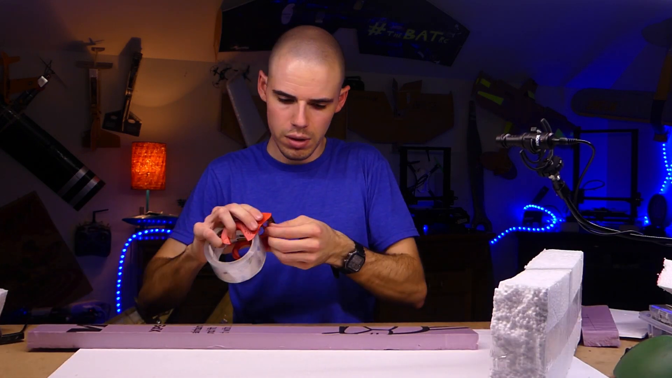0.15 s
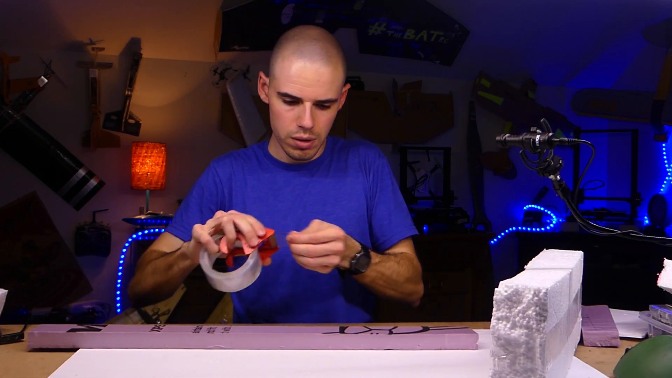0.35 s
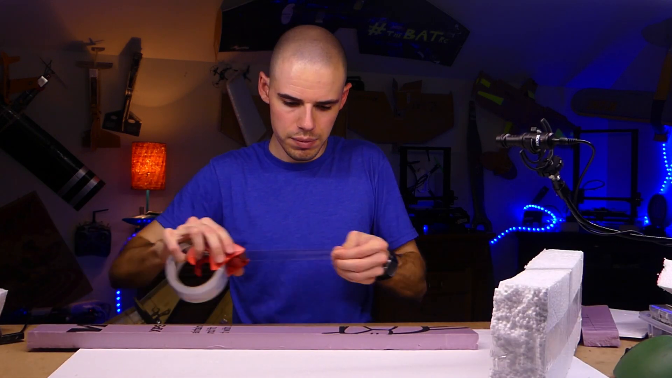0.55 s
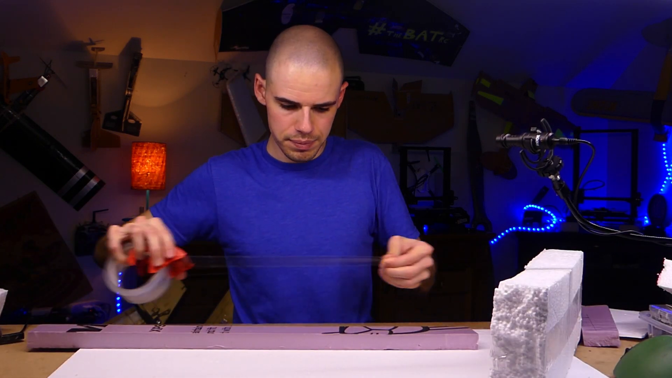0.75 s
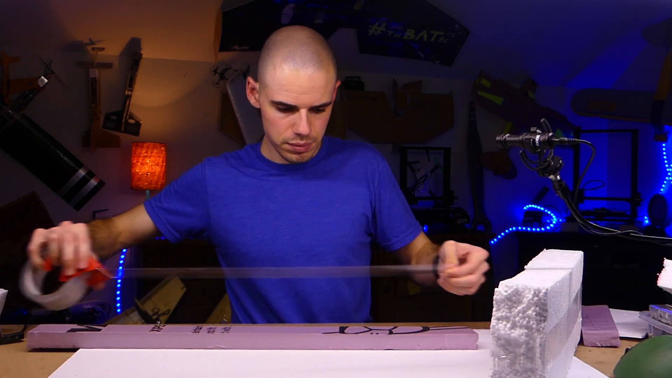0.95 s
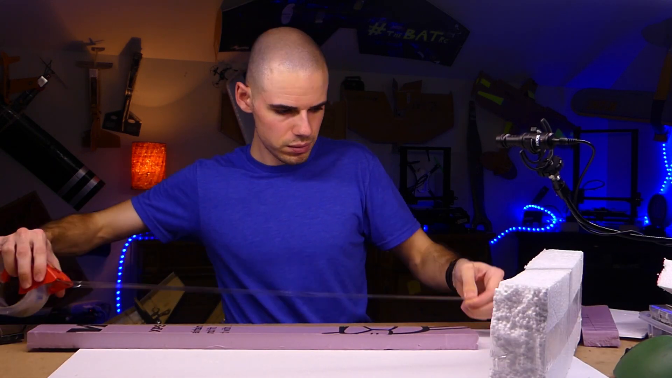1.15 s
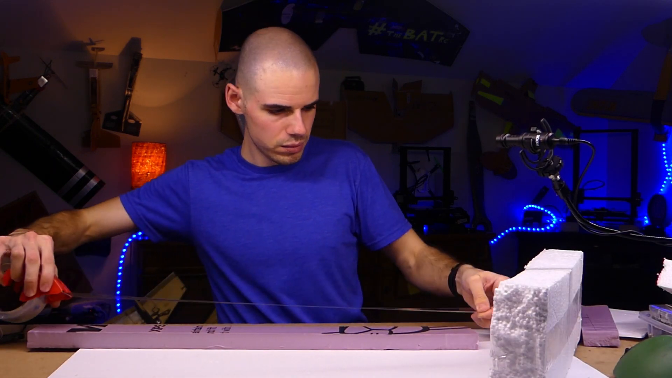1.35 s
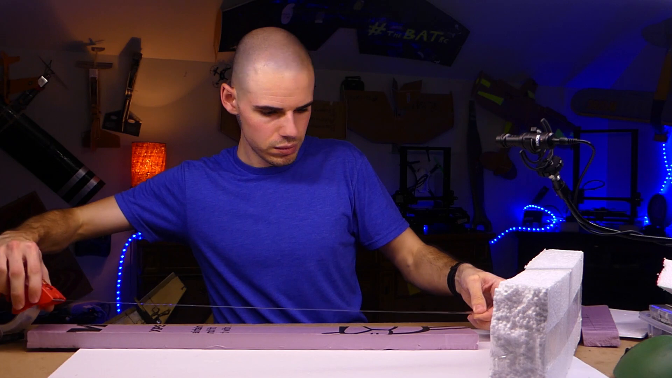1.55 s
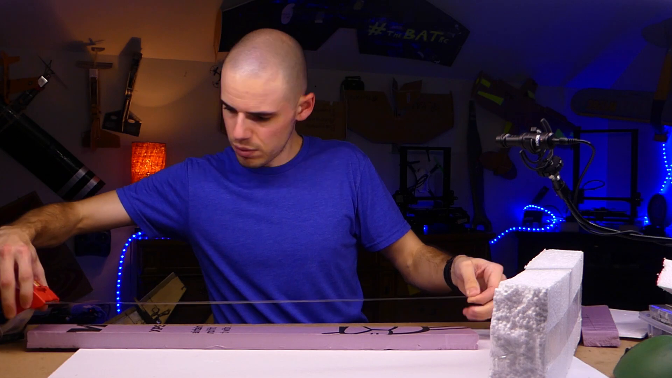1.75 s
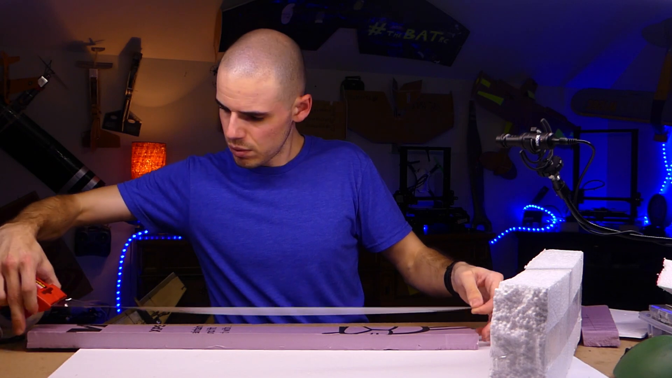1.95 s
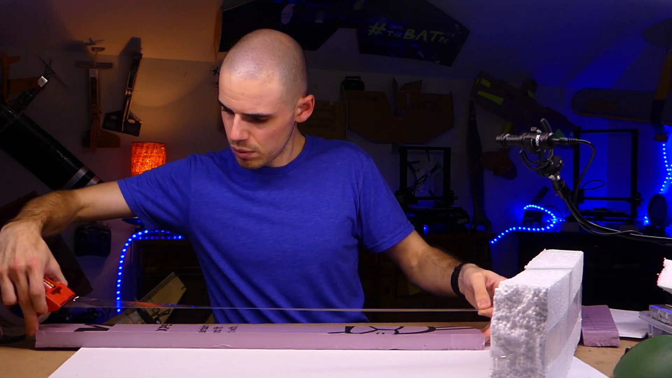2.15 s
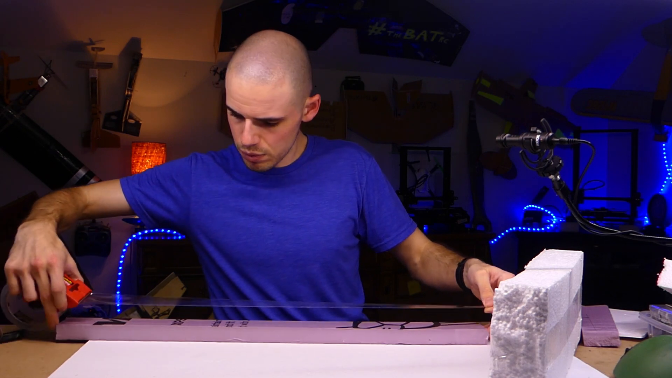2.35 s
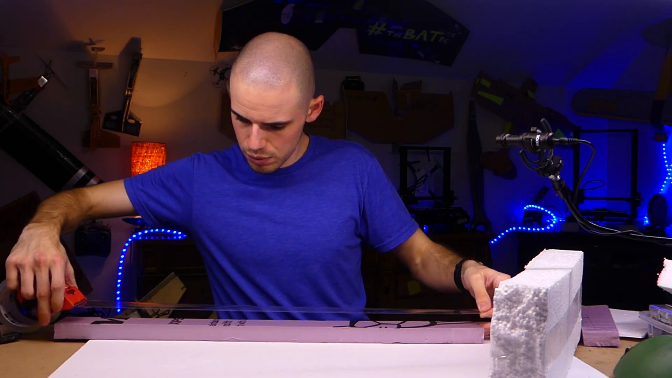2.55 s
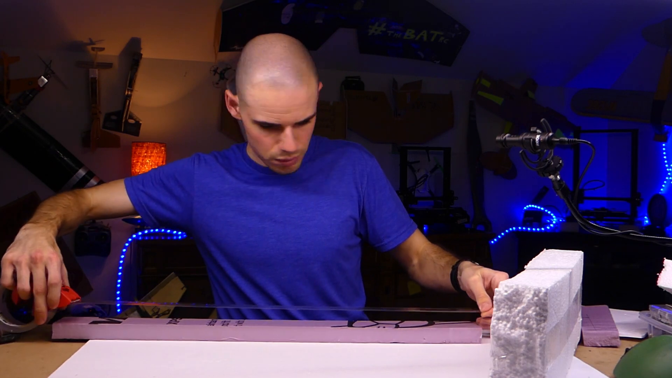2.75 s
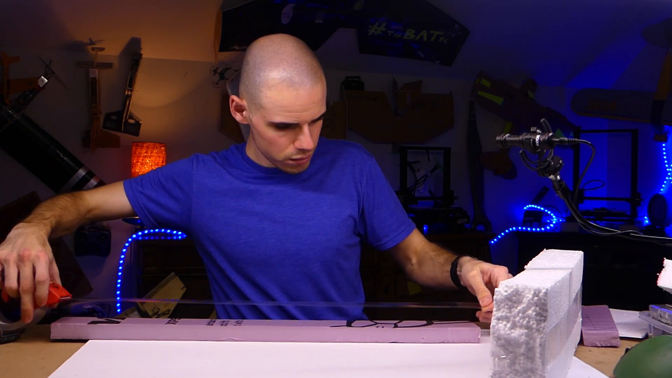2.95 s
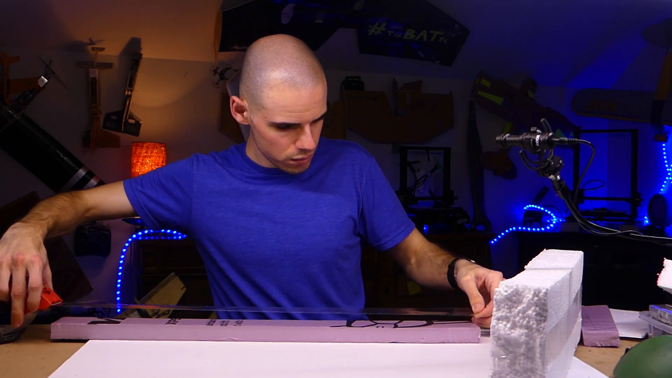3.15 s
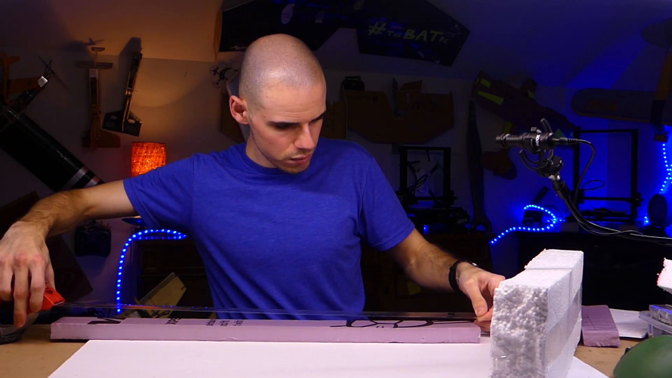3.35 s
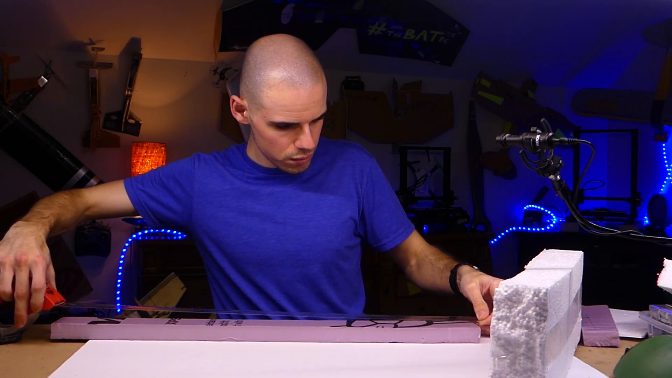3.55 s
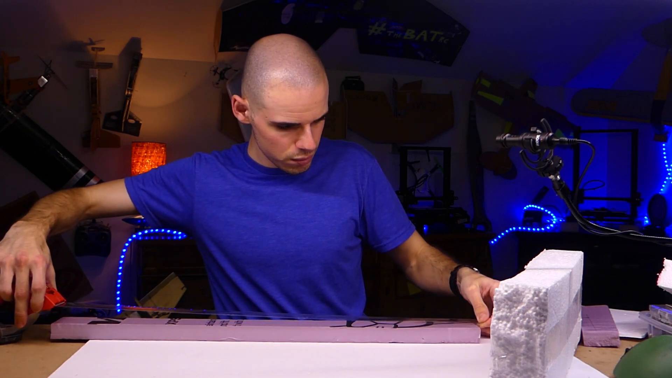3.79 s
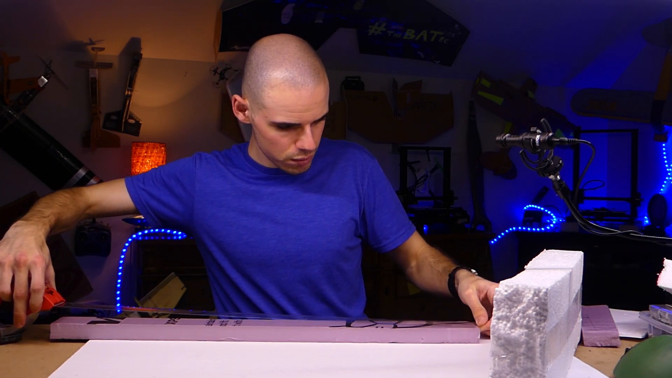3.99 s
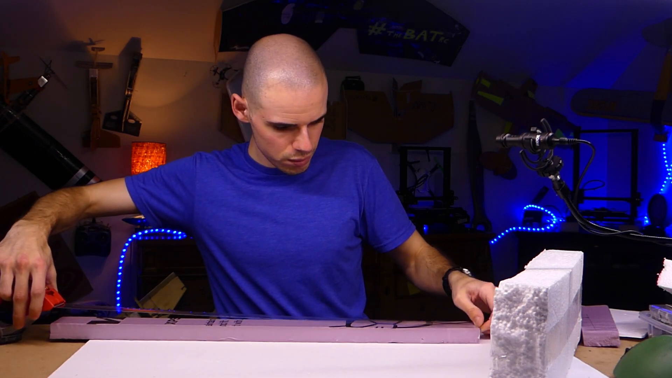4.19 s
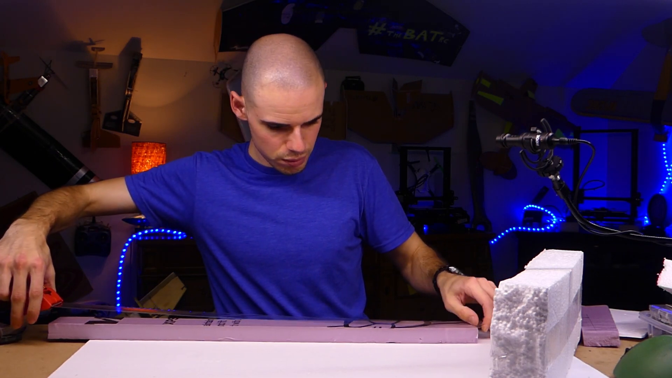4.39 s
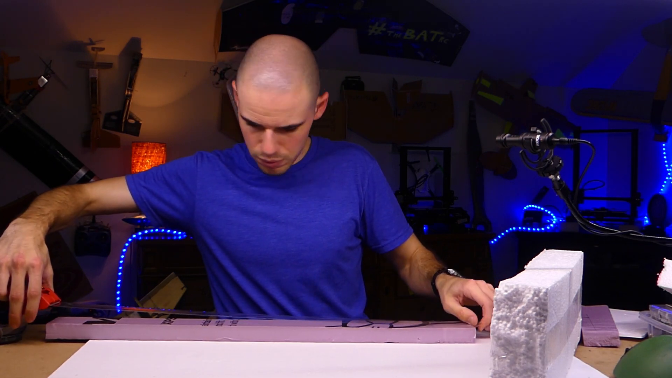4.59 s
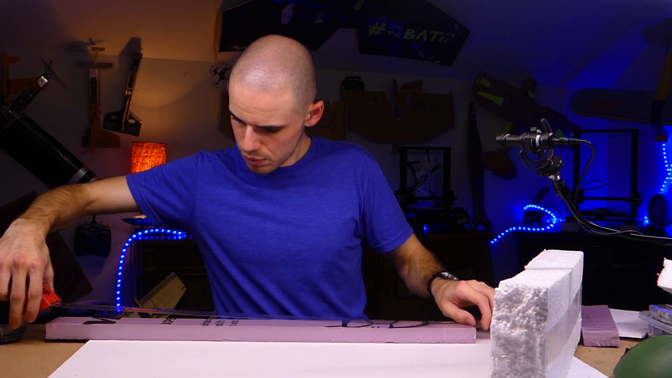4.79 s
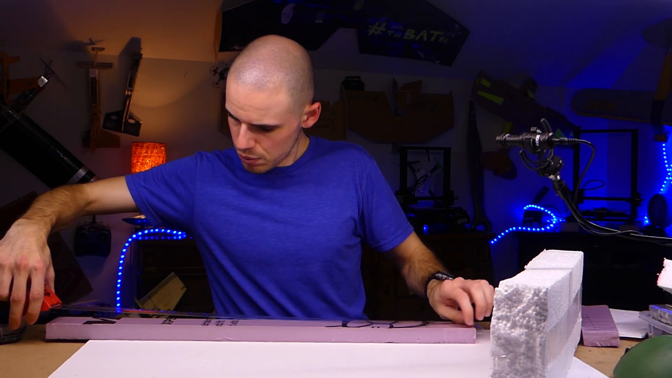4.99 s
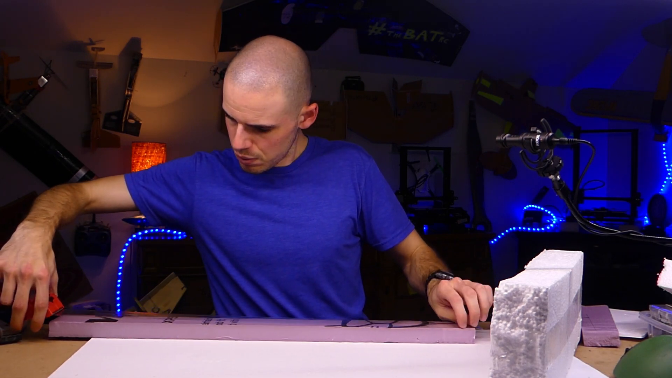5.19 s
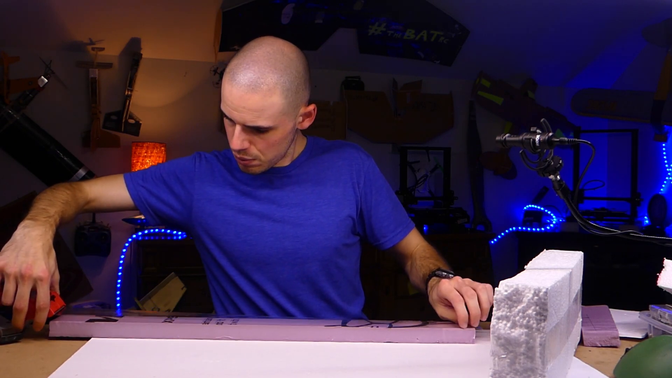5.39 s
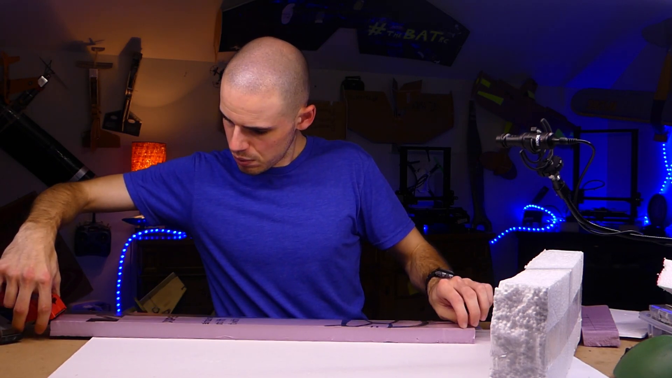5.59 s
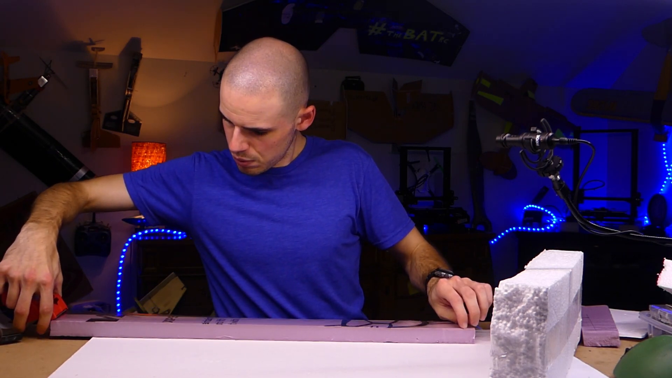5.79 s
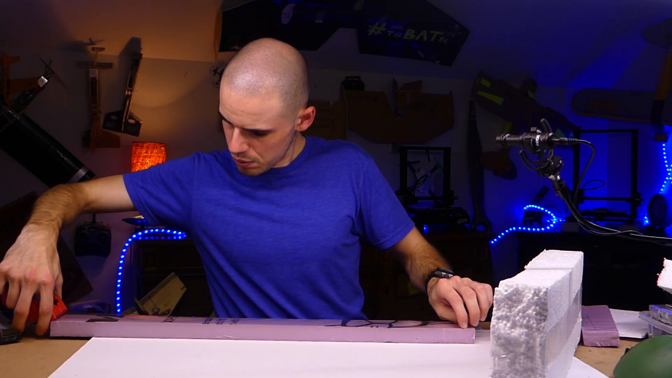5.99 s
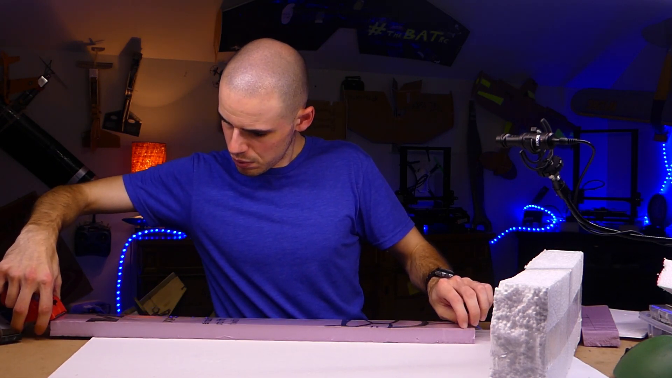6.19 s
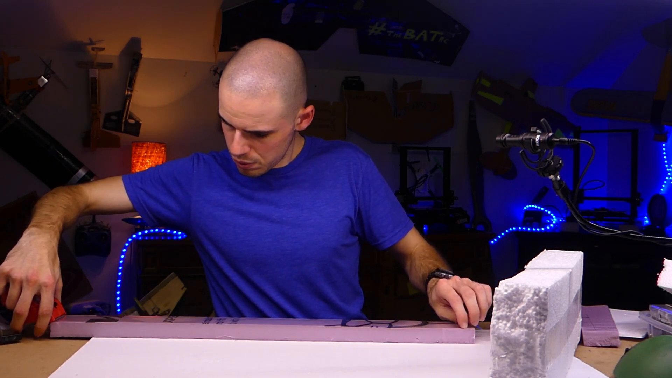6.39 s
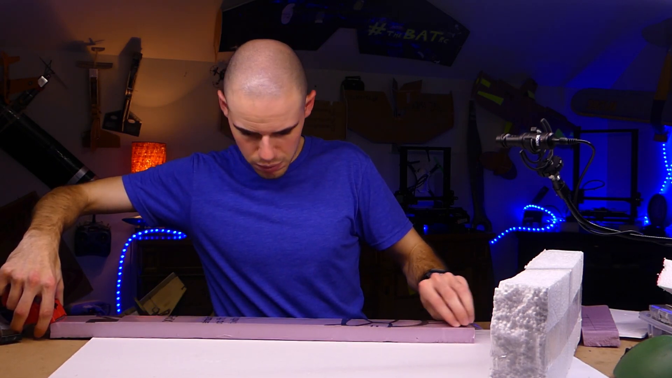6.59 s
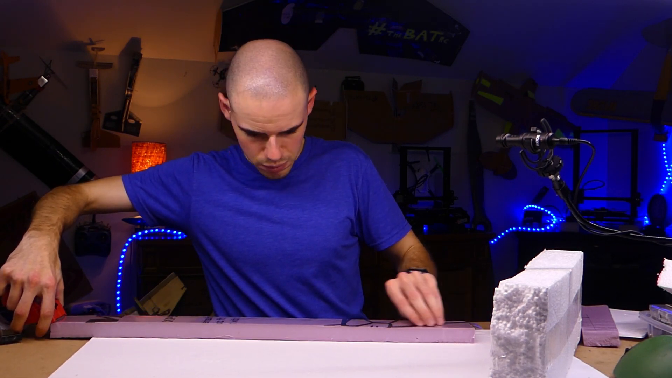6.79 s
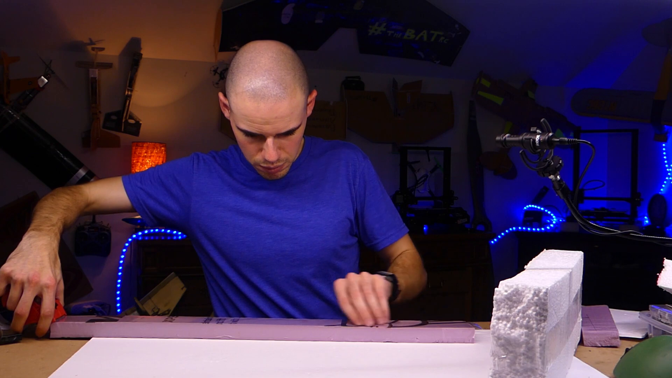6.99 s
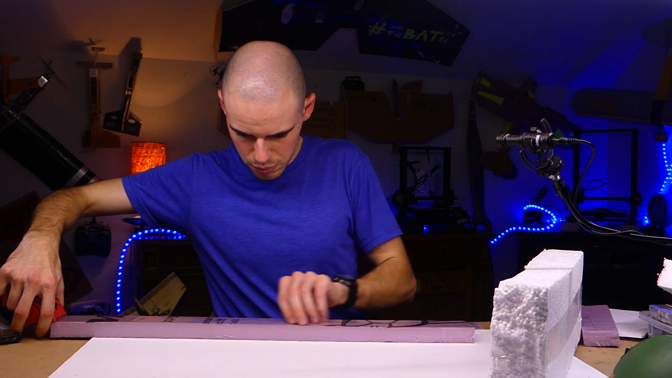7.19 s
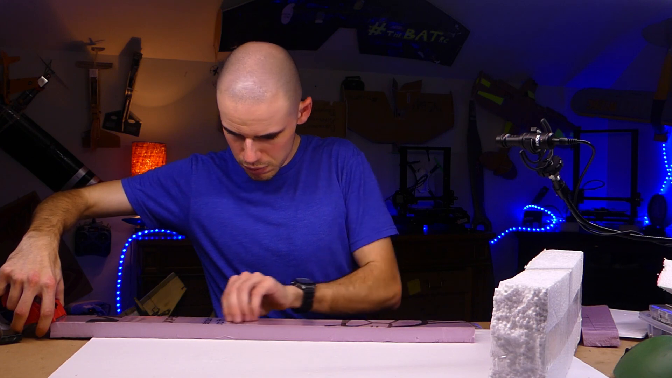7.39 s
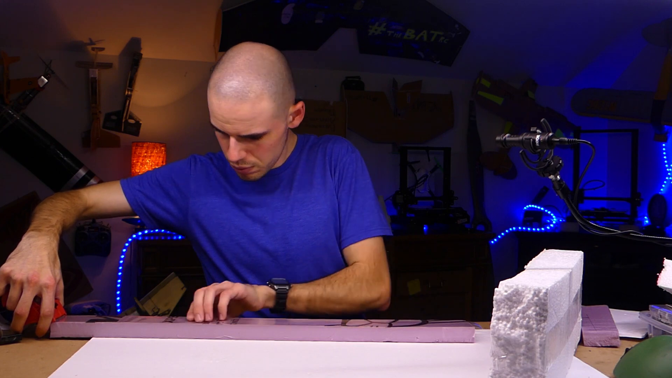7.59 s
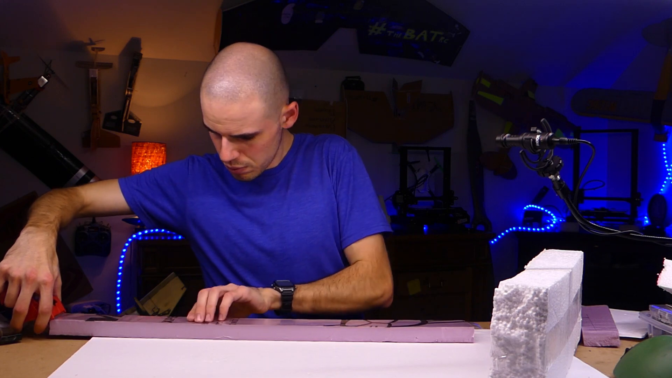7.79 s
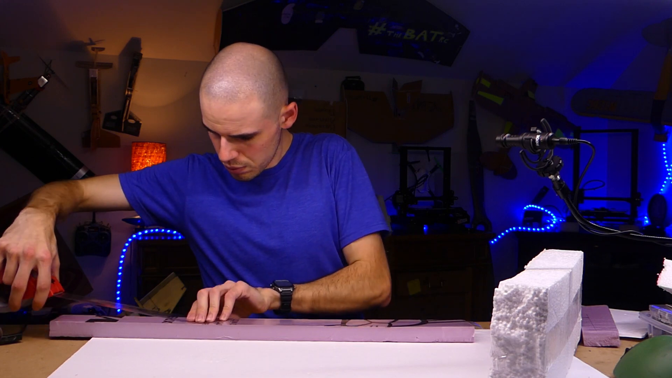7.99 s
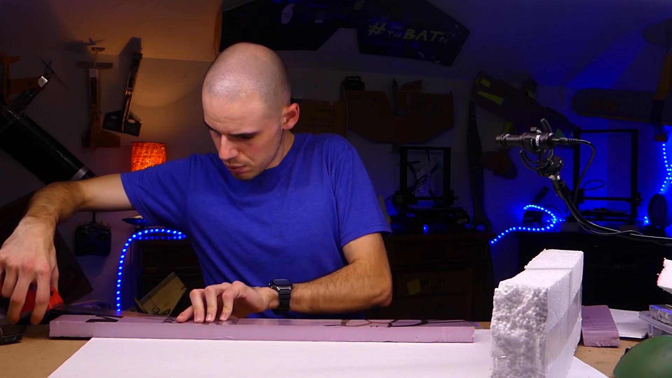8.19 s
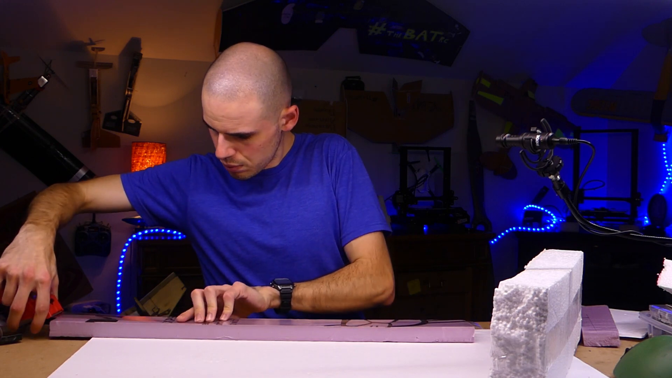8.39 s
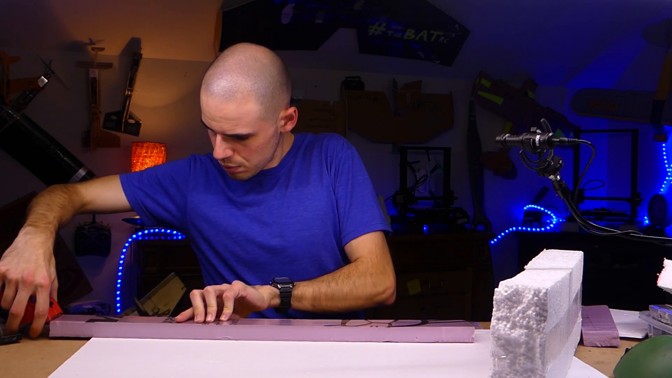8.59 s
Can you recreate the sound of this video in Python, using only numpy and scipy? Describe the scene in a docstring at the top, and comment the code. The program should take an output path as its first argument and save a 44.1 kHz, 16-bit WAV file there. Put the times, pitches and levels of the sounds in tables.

```python
"""Packing tape is ripped off a hand dispenser and stuck to a foam board, in a small damped room.
After a few ticks the glue lets go in jerky slips, tears steadily with a ringing roll, then slips again.
Fingers rub and tick on the strip, with a short rip near 3 s; it is pressed down and smoothed along.
Near the end the dispenser knocks on the bench. Noise makes each source, shaped by gains and resonances.
Low hum-like rumble and hiss lie under it all, and sink after loud sounds; the sound is nearly mono."""
import sys
import numpy as np
from scipy import signal
from scipy.fft import rfft, irfft, next_fast_len
from scipy.io import wavfile
from scipy.ndimage import uniform_filter1d, map_coordinates

SR = 44100
rng = np.random.default_rng(int(sys.argv[2]) if len(sys.argv) > 2 else 0)


def elevation(decibels):
    """Turn decibel levels (scalar or array-like) into linear amplitude ratios."""
    levels = np.asarray(decibels, float)
    return 10 ** (levels / 20)


def wrap_up_sound(samples):
    """Save the sound to the file named by the first command line argument, as 16-bit audio."""
    columns = np.atleast_2d(samples).T
    # keep every value between -1 and 1, then stretch to whole-number steps
    tamed = np.clip(columns, -1, 1)
    steps = np.round(tamed * 32767).astype(np.int16)
    wavfile.write(sys.argv[1], SR, steps)


N = 381465  # length in samples


def unit(x):
    """Scaled to rms 1."""
    return x / np.sqrt(np.mean(x ** 2) + 1e-20)


def along(points, hz):
    """Reads a curve of (pitch_hz, value) points on a logarithmic pitch axis."""
    point_hz, value = np.transpose(points)
    return np.interp(np.log(hz + 1), np.log(point_hz + 1), value)


def curves(rows, outside=None):
    """Joins rows over time: one value per sample for each column after the time."""
    s, *columns = np.transpose(rows)
    t = np.arange(N) / SR
    return [np.interp(t, s, column, outside, outside) for column in columns]


def filtered(x, response):
    """Multiplies the spectrum of x by a response of frequency."""
    m = next_fast_len(N + 8192)
    return irfft(rfft(x, m) * response(np.fft.rfftfreq(m, 1 / SR)), m)[..., :N]


def dulled(x):
    """Removes everything from 15.9 kHz up."""
    return filtered(x, lambda hz: hz < 15900)


def resonances(peaks):
    """Sums causal resonances of (pitch_hz, width_hz, level_db), with alternating signs."""
    def response(f):
        total = 0
        for k, (centre, width, db) in enumerate(peaks):
            peak = 1j * f * width / (centre * centre - f * f + 1j * f * width)
            total = total + (-1) ** k * elevation(db) * peak
        return total
    return response


def moving(x, centre_hz, wide_hz):
    """Passes x through a steep resonance whose centre moves; white noise keeps its rms."""
    turn = np.exp(2j * np.pi * np.cumsum(centre_hz) / SR)
    # turn the moving centre down to 0 Hz, filter there, and turn it back up
    low = signal.lfilter(*signal.butter(2, wide_hz / 2, fs=SR), x / turn)
    return np.real(turn * low) * np.sqrt(SR / wide_hz)


def hiss(spectrum, patchy_db):
    """Coloured noise of rms 1 with drifting patches of gain over time and pitch."""
    z = signal.stft(rng.standard_normal(N), nperseg=512)[2]
    field = uniform_filter1d(uniform_filter1d(rng.standard_normal(z.shape), 6, 0), 12, 1)
    patchy = signal.istft(z * elevation(patchy_db * unit(field)), nperseg=512)[1][:N]
    return unit(filtered(patchy, lambda hz: elevation(along(spectrum, hz))))


def crackle(per_s, spread_db, life, bed):
    """Gain of rms 1: threads snap at random, each dying in its short life (s), over a steady bed."""
    sizes = elevation(spread_db * rng.standard_normal(N))
    snaps = (rng.random(N) < per_s / SR) * sizes
    dying = signal.lfilter([1], [1, -np.exp(-1 / (life * SR))], snaps)
    return unit(bed + unit(dying))


def swells(rows, edge_db, bend):
    """Sums the power of (start, top, end, dB) swells, each sunk by edge_db at both ends."""
    t, power = np.arange(N) / SR, np.zeros(N)
    for start, top, end, db in rows:
        part = slice(max(round((top - 1) * SR), 0), round((top + 1) * SR))
        before = (top - t[part]) / max(top - start, 1e-3)
        after = (t[part] - top) / max(end - top, 1e-3)  # an end not after the top cuts off at once
        away = np.maximum(before, after)
        power[part] += elevation(db - np.minimum(edge_db * away ** bend, 200)) ** 2
    return np.sqrt(power)


def add(track, s, shape):
    """Lays a shape on the track from time s."""
    part = track[round(s * SR):][:len(shape)]
    part += shape[:len(part)]


# steady tear of the glue: time_s, level_db, slips_per_s
STEADY_TEAR = [(.72, -34, 151), (.8, -36, 201), (.9, -37, 338), (1.08, -36, 274), (1.156, -34, 150),
               (1.17, -33.5, 120)]


def stick_slip():
    """Gain of rms 1: in the steady tear the glue holds and lets go at a nearly even pace."""
    pace = curves(STEADY_TEAR, 0)[1]
    turns = np.cumsum(pace) / SR
    scatter = 0.18 * rng.standard_normal(int(np.ceil(turns[-1] - 2)))  # in slip periods
    at = np.searchsorted(turns, np.arange(1, turns[-1] - 1) + scatter)
    sizes = elevation(1.7 * rng.standard_normal(len(at)))
    slips = np.bincount(at, sizes, N + 1)[:N]
    beat = signal.lfilter([1], [1, -np.exp(-1 / (0.0012 * SR))], slips)  # each slip dies in about 1.2 ms
    tearing = pace > 0
    beat = 1.5 + beat / np.std(beat[tearing])  # over a steady share
    return np.where(tearing, beat / np.sqrt(np.mean(beat[tearing] ** 2)), 1)


# slips of the glue, short snaps and longer jerks: start_s, level_db, hold_s
GLUE_SLIPS = [(0.3253, -25.5, 0.00023), (0.332, -25, 0.00078), (0.341, -28, 0.0025), (0.3534, -29, 0.00057),
              (0.356, -29.5, 0.0015), (0.361, -30.5, 0.0013), (0.3745, -26, 0.0031), (0.378, -34.5, 0.0022),
              (0.425, -27.5, 0.005), (0.472, -29, 0.0063), (0.477, -34, 0.011), (0.496, -34, 0.01),
              (0.51, -31, 0.0099), (0.533, -30.5, 0.0082), (0.556, -33.5, 0.0063), (0.578, -32.5, 0.011),
              (0.606, -33.5, 0.011), (0.623, -26.5, 0.0005), (0.634, -32.5, 0.032), (0.669, -34, 0.0091),
              (0.684, -32.5, 0.013), (0.702, -33, 0.017), (1.174, -34.5, 0.0082), (1.1874, -34.5, 0.004),
              (1.198, -37, 0.0054), (1.216, -29.5, 0.00057), (1.221, -31.5, 0.00074), (1.346, -42, 0.0029),
              (1.35, -34, 0.0011), (1.357, -34, 0.0024), (1.3704, -31.5, 0.0056), (1.3896, -30.5, 0.005),
              (1.3954, -30, 0.0016), (1.418, -32.5, 0.0044), (2.8366, -24, 0.0065), (2.844, -28.5, 0.0012),
              (2.859, -27.5, 0.0032), (2.873, -38, 0.0028), (2.8787, -29.5, 0.0024), (2.9083, -37, 0.0013),
              (2.9997, -31.5, 0.002), (3.0059, -24.5, 0.0018), (3.0226, -30, 0.0038), (3.0468, -29, 0.0029),
              (3.055, -33.5, 0.00053), (3.072, -30, 0.0025), (3.087, -25, 0.00063), (4.923, -31.5, 0.00067),
              (4.932, -35, 0.0025), (8.0016, -31.5, 0.002), (8.012, -32.5, 0.0021), (8.022, -31, 0.0013)]


def jerks():
    """Each slip rises fast with an extra kick, holds, then falls 60 dB in 18 ms."""
    out, t = np.zeros(N), np.arange(SR // 10) / SR
    for s, db, hold in GLUE_SLIPS:
        fall = elevation(db - 60 * np.maximum(t - hold, 0) / 0.018)
        rise = 1 - np.exp(-t / (0.0001 + 0.035 * hold))
        kick = 0.8 + 0.75 * np.exp(-t / 0.0009)
        add(out, s, fall * rise * kick)
    return out


# resonances of the hollow roll: pitch_hz, width_hz, level_db
ROLL_PEAKS = [(620, 160, -0.5), (1100, 3900, -8), (2190, 590, 0)]
# how much the roll joins in: time_s, level_db (over the film)
ROLL_SHARE = [(.33, -9), (.6, -9), (1.3, -10), (3.1, -13.5), (4.9, -5)]


def roll(force):
    """The hollow roll rings when the peeling force shakes it."""
    white = rng.standard_normal(N)
    peaks = resonances(ROLL_PEAKS)
    return filtered(white * force * elevation(curves(ROLL_SHARE)[0]), peaks) / np.std(filtered(white, peaks))


# two shifting resonances of the taut strip, levels over the film:
# time_s, low_pitch_hz, low_level_db, high_pitch_hz, high_level_db
STRIP_PEAKS = [(.42, 476, -31, 2020, -13.5), (.5, 474, -10, 1970, -6), (.56, 536, -7.5, 2200, 2),
               (.63, 500, -19, 1970, -2.5), (.68, 620, -10, 2220, 0.5), (.76, 790, -12.5, 2130, -6.5),
               (.95, 730, -29, 2250, -12), (1.25, 650, -32, 2170, -15.5)]


def strip(force):
    """The taut strip rings at two pitches that shift during the pull."""
    low_hz, low_db, high_hz, high_db = curves(STRIP_PEAKS)
    sample = np.arange(N)
    pulled = (sample >= STRIP_PEAKS[0][0] * SR) & (sample < STRIP_PEAKS[-1][0] * SR)
    drive = pulled * force * rng.standard_normal((2, N))
    low = elevation(low_db) * moving(drive[0], low_hz, wide_hz=220)
    high = elevation(high_db) * moving(drive[1], high_hz, wide_hz=650)
    return low + high


# colour of the stretched film: pitch_hz, level_db (per Hz, relative)
FILM_COLOUR = [(710, -25.5), (1200, -4.5), (1450, -10), (2220, -6.5), (2610, -7.5), (5270, -1),
               (7010, -2.5), (8640, 0), (11300, -8), (13500, -5), (15600, -10), (16100, -38.5)]
# colour of the bright edge on each jerk: pitch_hz, level_db (per Hz, relative)
EDGE_COLOUR = [(6000, -9.5), (12000, -2.5), (16400, -7.5), (16800, -56.5)]


def peel(beat):
    """Slips and tear excite the stretched film, the taut strip and, lower, the hollow roll."""
    # a jerk frees many threads at once
    force = jerks() * crackle(per_s=2500, spread_db=3, life=0.0003, bed=2.2)
    edge = elevation(-16.5) * force * hiss(EDGE_COLOUR, patchy_db=6.5)
    tear_level = elevation(curves(STEADY_TEAR, -120)[0])
    force += tear_level * beat * crackle(per_s=2000, spread_db=2.5, life=0.0003, bed=2.2)
    film = force * hiss(FILM_COLOUR, patchy_db=3.0)
    small = signal.butter(3, 300, "highpass", fs=SR)  # the peel carries nothing below about 300 Hz
    return signal.lfilter(*small, dulled(film + roll(force) + strip(force) + edge))


# narrow bands stand out briefly while the strip is pulled or stroked:
# middle_s, length_s, pitch_hz, level_db
SINGING_BANDS = [(.78, 0.12, 4900, -42.5), (.87, 0.18, 5350, -44.5), (.88, 0.22, 8700, -43.5),
                 (1.05, 0.3, 9200, -44.5), (1.68, 0.28, 1100, -65), (1.719, .55, 1624, -66),
                 (1.89, 0.3, 1100, -64.5), (2.7, 0.28, 1100, -68), (7.05, 0.51, 5500, -62),
                 (7.137, 0.33, 11800, -56.5), (7.35, .65, 2090, -65.5), (7.441, 0.13, 4460, -56.5),
                 (7.51, 0.16, 5000, -52.5), (7.561, 0.32, 8550, -59.5)]


def singing():
    """Friction noise swells and fades inside narrow resonances, in broken patches."""
    out, t = np.zeros(N), np.arange(SR) / SR
    flutter_db, flutter_per_s = 3.5, 25
    for middle, length, hz, db in SINGING_BANDS:
        share = 0.055 * (hz / 5000) ** 0.25  # width over centre: lower bands are narrower
        band = unit(signal.lfilter(*signal.iirpeak(hz, 1 / share, SR), rng.standard_normal(SR)))
        flutter = map_coordinates(rng.standard_normal(flutter_per_s + 4), [t * flutter_per_s])
        swell = np.sin(np.pi * np.minimum(t / length, 1))
        add(out, middle - length / 2, elevation(db + flutter_db * flutter) * band * swell)
    return out


# fingers and strip slide, or the strip peels slowly, each swelling and fading:
# start_s, strongest_s, end_s, level_db (an end not after the strongest moment stops it at once)
SLIDES = [(1.47, 1.575, 1.8, -58), (1.65, 1.935, 2.026, -57), (2.12, 2.185, 2.26, -58.5),
          (2.2, 2.4, 2.55, -50.5), (2.45, 2.77, 2.86, -62.5), (3.06, 3.11, 3.13, -51.5),
          (4.03, 4.06, 4.2, -68), (4.1, 4.28, 4.61, -65.5), (4.39, 4.49, 4.73, -59),
          (5.12, 5.27, 5.41, -54), (5.48, 5.6, 5.6, -60), (5.9, 6.0, 6.03, -72), (7.74, 7.85, 7.91, -64.5),
          (7.9, 7.97, 7.64, -57), (8.49, 8.54, 7.94, -74)]
# brief brushes of a fingertip: strongest_s, level_db
FINGER_BRUSHES = [(2.08, -54.5), (2.577, -58.5), (2.671, -56), (5.461, -60.5), (6.139, -69.5), (6.356, -62),
                  (6.461, -61.5), (6.53, -62.5), (6.656, -56.5), (7.943, -61)]
# a hand runs along the strip: time_s, level_db
HAND_SMOOTHING = [(6.62, -82), (6.7, -64), (7.1, -53.5), (7.38, -51), (7.525, -48), (7.58, -52),
                  (7.655, -51.5), (7.735, -67.5), (7.8, -79)]
# a dull drone while the strip is pressed to the board: start_s, strongest_s, end_s, level_db
BOARD_PRESSING = [(4.7, 5.25, 6.1, -60)]
# colours of sliding skin, its treble, and the board: pitch_hz, level_db (per Hz, relative)
SKIN_COLOUR = [(180, -31), (300, -5), (1380, -1), (1810, 2), (3510, 1.5), (4880, 2.5), (8000, -2),
               (10400, -29), (17600, -120)]
FIZZ_COLOUR = [(4120, -20.5), (7000, -7.5), (9950, -9.5), (14800, -14.5), (15700, -16), (16100, -44.5)]
BOARD_COLOUR = [(60, -32), (130, -5.5), (350, -7.5), (700, -8.5), (1500, -33)]


def rub(sink_db):
    """Skin slides or the strip peels slowly, gritty and brighter when stronger; pressing makes a drone."""
    brushes = [(s - 0.019, s, s + 0.037, db) for s, db in FINGER_BRUSHES]
    sway = map_coordinates(rng.standard_normal(round(N * 8 / SR) + 4), [np.arange(N) * 8 / SR])
    rustle = elevation(-76.5 - sink_db - 3.1 * sway)  # faint handling that never quite stops
    slides = swells(SLIDES + brushes, edge_db=24, bend=1.87)
    level = slides + elevation(curves(HAND_SMOOTHING, -120)[0]) + rustle
    grit = crackle(per_s=2500, spread_db=3, life=0.0003, bed=3.5)
    # treble is -2 dB when the slide is at -60 dB, and gains 0.21 dB for each dB of slide
    treble = elevation(-2) * (level / elevation(-60)) ** 0.21
    colour = hiss(SKIN_COLOUR, patchy_db=2.2) + treble * hiss(FIZZ_COLOUR, patchy_db=2.0)
    drone = swells(BOARD_PRESSING, edge_db=15.0, bend=0.83) * hiss(BOARD_COLOUR, patchy_db=1.5)
    return dulled(grit * level * colour) + drone


# ticks of film, nail and plastic: start_s, level_db, pitch_hz
SMALL_TICKS = [(0.097, -44, 5700), (0.1793, -37, 3400), (0.193, -41, 3720), (0.232, -30, 2050),
               (0.2587, -32.5, 2060), (1.705, -43, 8700), (2.0664, -37.5, 6110), (2.079, -29.5, 3830),
               (2.485, -29, 6000), (3.256, -51, 1390), (3.522, -39.5, 2390), (4.2262, -44.5, 6400),
               (4.345, -32.5, 2640), (4.4986, -43.5, 5640), (4.6794, -37.5, 6600), (4.768, -44.5, 1800),
               (4.8813, -45, 8320), (4.9106, -35, 1400), (4.922, -18, 2700), (5.003, -42.5, 3600),
               (5.062, -46, 3650), (5.1249, -41, 1490), (5.1485, -41, 3900), (5.465, -47, 5040),
               (5.6962, -36.5, 2500), (5.927, -53, 5860), (6.2118, -40, 1660), (6.25, -49.5, 7500),
               (6.2684, -46, 7700), (6.353, -34, 2390), (6.4387, -40, 1570), (6.5604, -37.5, 9300),
               (6.584, -24.5, 2920), (6.6661, -29.5, 5140), (6.74, -43, 5270), (7.6016, -22, 5220),
               (7.654, -30, 4250), (7.675, -36.5, 7620), (7.9223, -41, 6380), (7.941, -36, 1500),
               (7.9497, -36.5, 3800), (8.1923, -36, 1722), (8.306, -51.5, 2701), (8.3746, -44.5, 1960)]
# soft bumps on the board: start_s, level_db, pitch_hz
SOFT_BUMPS = [(2.067, -49, 514), (2.444, -49.5, 440), (2.624, -54.5, 298), (4.921, -53, 413),
              (5.212, -49.5, 663), (5.347, -52.5, 523), (5.511, -56, 363), (5.927, -52.5, 470)]


def ticks():
    """Each tick is a crack spread about its centre, with a brief ring; each bump a dull swing of the board."""
    out, t = np.zeros(N), np.arange(SR // 5) / SR
    for s, db, hz in SMALL_TICKS:
        burst = rng.standard_normal(len(t)) * elevation(-60 * t / 0.016)
        crack = signal.lfilter(*signal.iirpeak(hz, 1.1, SR), burst)
        ring = np.sin(2 * np.pi * hz * t) * elevation(-60 * t / 0.0035)
        add(out, s, elevation(db) * (0.76 * crack + 0.5 * ring))
    for s, db, hz in SOFT_BUMPS:
        overtone = 0.71 * elevation(-60 * t / 0.026) * np.sin(2 * np.pi * 2.1 * hz * t)
        swing = np.sin(2 * np.pi * hz * t) + overtone
        add(out, s, elevation(db + 7.5 - 60 * t * hz / 6.9) * swing)  # down 60 dB after 6.9 swings
    return out


# the dispenser meets the bench and bounces: start_s, level_db
BOUNCES = [(7.979, -16.5), (7.982, -17.5), (7.9834, -20), (7.986, -20.5)]
# ringing of its plastic frame: pitch_hz, level_db, fall_by_60_db_s
FRAME_RINGS = [(674, -45, 0.23), (718, -10, 0.017), (1150, -12.5, 0.012), (2510, -6.5, 0.015),
               (3830, 7, 0.0033), (6160, -4, 0.007)]


def knock():
    """The plastic frame rings at new strengths on every bounce, under a dry crack."""
    out, t = np.zeros(N), np.arange(SR // 5) / SR
    for s, db in BOUNCES:
        ring = 0
        for hz, level, t60 in FRAME_RINGS:
            strength = elevation(level + rng.normal(0, 3.9) - 60 * t / t60)
            ring = ring + strength * np.sin(2 * np.pi * hz * t)
        burst = elevation(-60 * t / 0.0069) * rng.standard_normal(len(t))
        crack = signal.lfilter(*signal.iirpeak(4500, 0.7, SR), burst)
        rise = 1 - np.exp(-t / 0.00027)
        add(out, s, elevation(db - 2.5) * (ring + 1.5 * crack) * rise)
    return out


# how long the room rings: pitch_hz, fall_by_60_db_s
ROOM_DECAY = [(500, 0.63), (2000, 0.35), (8000, 0.24), (15000, 0.2)]
# echoes of near surfaces: delay_s, level_db
NEAR_ECHOES = [(.0047, -15), (.0088, -14.5), (0.017, -26.5)]


def room(x, tail_db, size=2048):
    """Adds to x near echoes, then a tail dying by pitch, its detail redrawn for each short piece."""
    out, fade = np.pad(x, (0, SR)), signal.get_window("hann", size)
    for start in range(0, N, size // 2):
        hz, t, z = signal.stft(rng.standard_normal(SR // 2), SR, nperseg=256)
        decay = elevation(-60 * t / along(ROOM_DECAY, hz)[:, None])
        tail = signal.istft(z * decay, SR, nperseg=256)[1]
        reply = elevation(tail_db) * np.pad(tail / np.linalg.norm(tail), (300, 0))
        for delay, db in NEAR_ECHOES:
            reply[round(delay * SR)] += elevation(db)
        piece = x[start:start + size] * fade[:N - start]
        add(out, start / SR, signal.fftconvolve(piece, reply))
    return out[:N]


def sinking(near):
    """How many dB the background is pushed down by the near sounds, creeping back after each."""
    level_db = 10 * np.log10(np.abs(uniform_filter1d(near ** 2, size=2048)) + 1e-12)
    push_db = np.maximum(0.42 * (level_db + 52.5), 1e-3)  # starts at -52.5 dB
    clock = np.arange(N) / SR / 0.77  # the push fades with a 0.77 s time constant
    quick = np.exp(np.maximum.accumulate(np.log(push_db) + clock) - clock)
    # a long loud sound pushes further than a short one: a slow memory of 2.3 s
    leak = 1 / (2.3 * SR)
    piled = 2.1 * signal.lfilter([leak], [1, leak - 1], push_db)
    at_start = 2 * np.exp(-leak * np.arange(N))  # already 2 dB down at the start, then fading
    return uniform_filter1d(quick, size=2048) + piled + at_start


# colour of the background rumble: pitch_hz, level_db (per Hz, relative)
RUMBLE_COLOUR = [(12, -19), (25, 1), (60, -11.5), (100, -20), (200, -54.5)]
# the rumble swells, as when weight shifts on the bench: strongest_s, level_db
BENCH_LEANS = [(2.1, -74), (5.04, -61), (6.81, -66), (7.38, -65.5), (8.06, -62)]


def rumble(sink_db):
    """Deep noise that sinks 0.85 times as far as the air, with brief swells on top."""
    rows = [(s - 0.069, s, s + 0.11, db) for s, db in BENCH_LEANS]
    leans = swells(rows, edge_db=14.5, bend=0.43)
    return (elevation(-71.5 - 0.85 * sink_db) + leans) * hiss(RUMBLE_COLOUR, patchy_db=1.5)


# colour of the low hum and hiss: pitch_hz, level_db (per Hz, relative)
AIR_COLOUR = [(41, -23), (70, -2.5), (149, 1), (371, -10.5), (720, -8), (1090, -16), (1530, -19),
              (3260, -36), (8900, -28.5), (15600, -25), (16100, -48)]
# level of the unlike share in the two channels: pitch_hz, level_db
UNLIKE_SHARE = [(60, -23.5), (1000, -23.5), (4000, -20.5), (12000, -19.5), (15600, -17), (16000, -48)]
# colour of the hiss that differs between channels: pitch_hz, level_db (per Hz, relative)
SIDE_HISS_COLOUR = [(50, -2), (15500, -2), (16000, -37.5)]


def scene():
    """Both channels get the same sound, plus a faint scrambled share and hiss of opposite sign in each."""
    beat = stick_slip()
    blow = knock()
    # the knock sends a smaller share of itself into the room
    near = room(peel(beat) + ticks() + 0.6 * blow, tail_db=-11.5) + 1.09 * blow
    sink_db = sinking(near)
    air_gain = elevation(-61.5 - sink_db)
    background = air_gain * hiss(AIR_COLOUR, patchy_db=1.1) + rumble(sink_db)
    mid = near + rub(sink_db) + dulled(beat * singing()) + background
    # random phases make the unlike share
    z = signal.stft(mid - 0.3 * near + 0.3 * background, nperseg=512)[2]
    scrambled = signal.istft(z * np.exp(2j * np.pi * rng.random(z.shape)), nperseg=512)[1][:N]
    side = filtered(scrambled, lambda hz: elevation(along(UNLIKE_SHARE, hz)))
    side += air_gain * elevation(-14.0) * hiss(SIDE_HISS_COLOUR, patchy_db=5.0)
    return np.array([mid + side, mid - side])


def band_limit(x):
    """A steep low-pass at the top of the band."""
    return signal.sosfilt(signal.butter(12, 16800, fs=SR, output="sos"), x)


# a narrow dip in the microphone: pitch_hz, width_hz
MICROPHONE_DIP = (5950, 110)


def record(dry):
    """The microphone takes a narrow dip out of the treble."""
    hz, width = MICROPHONE_DIP
    mix = signal.lfilter(*signal.iirnotch(hz, hz / width, SR), dry)
    return band_limit(mix)


dry = scene()
out = record(dry)
wrap_up_sound(out)
```